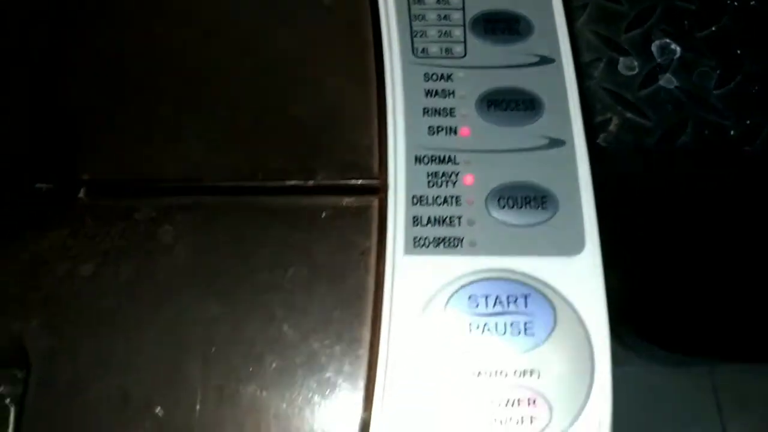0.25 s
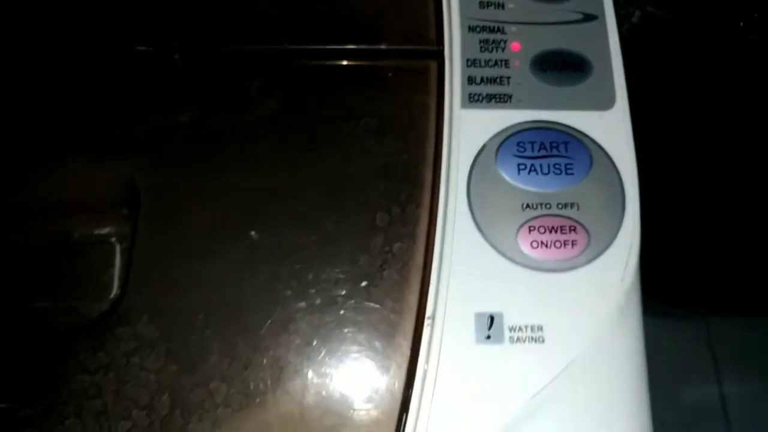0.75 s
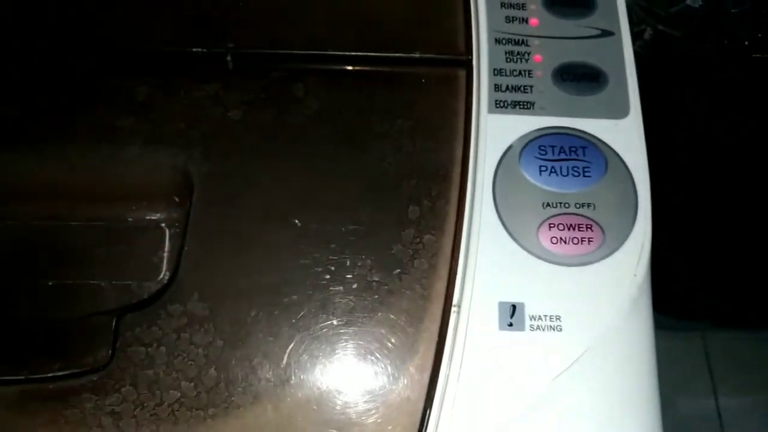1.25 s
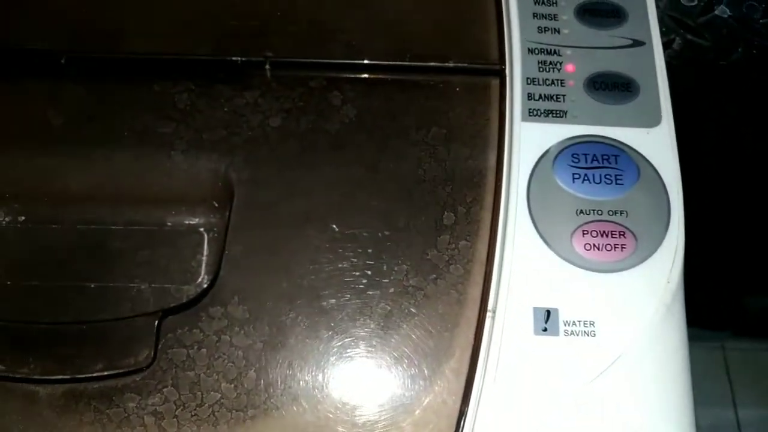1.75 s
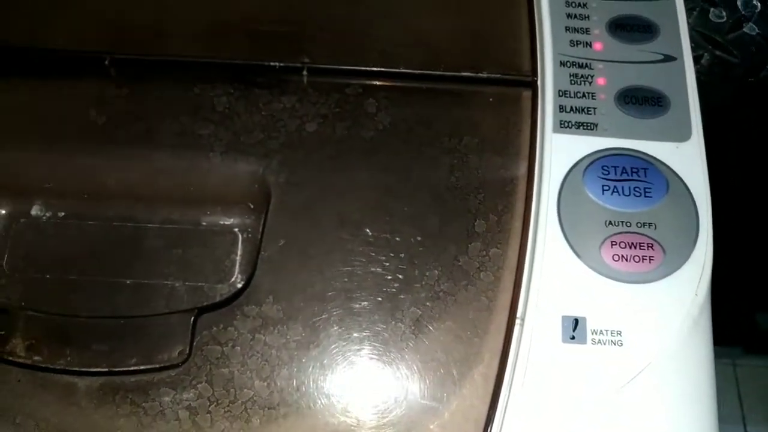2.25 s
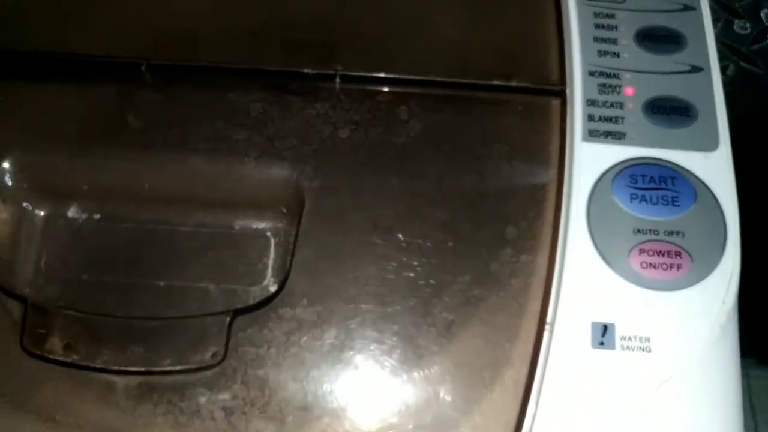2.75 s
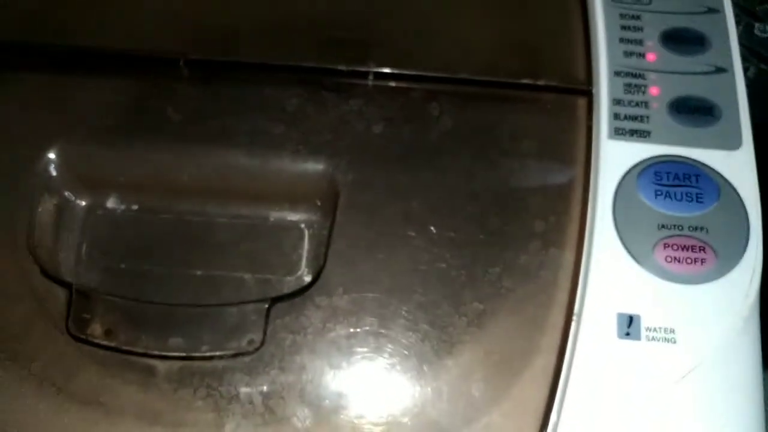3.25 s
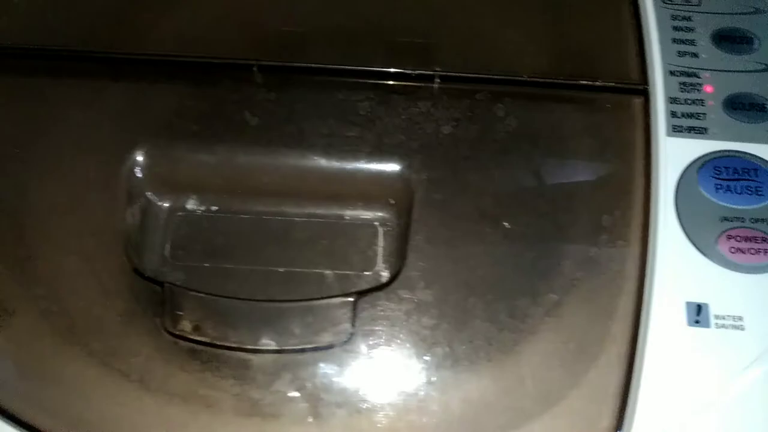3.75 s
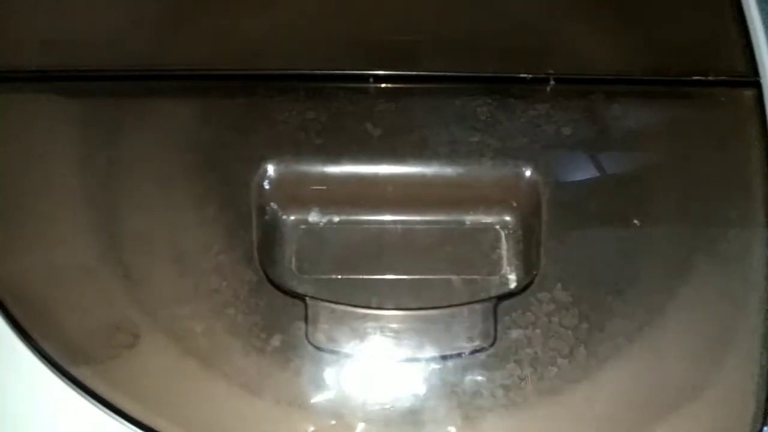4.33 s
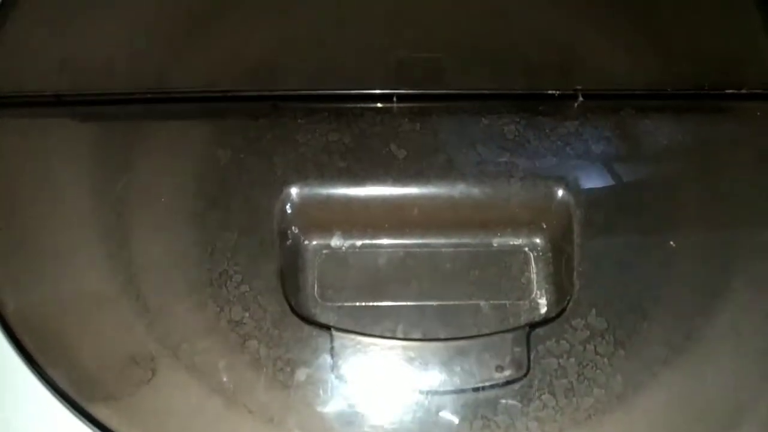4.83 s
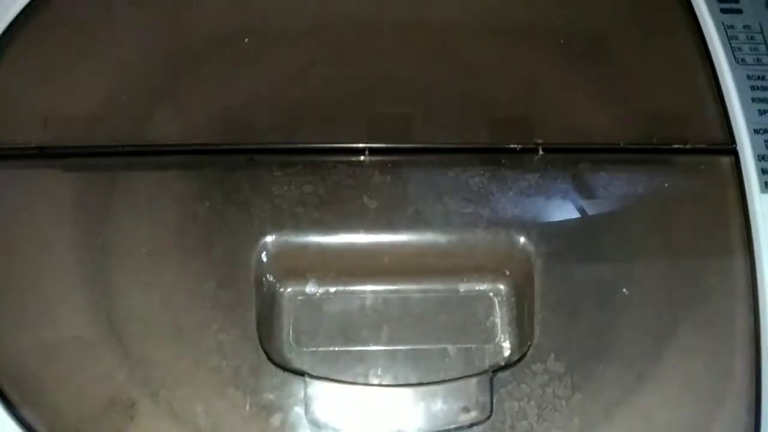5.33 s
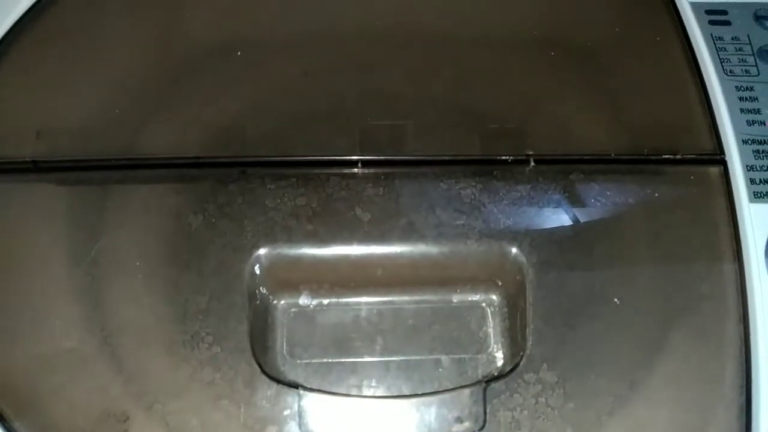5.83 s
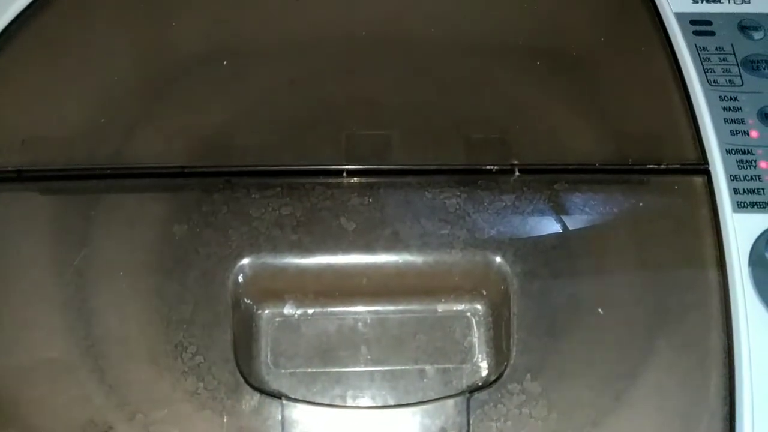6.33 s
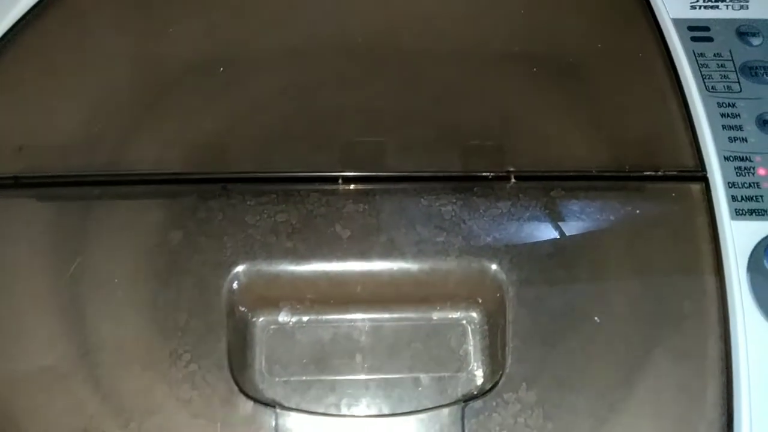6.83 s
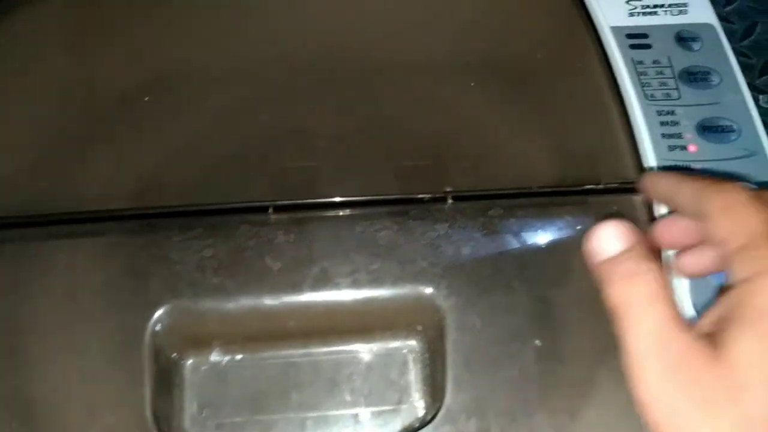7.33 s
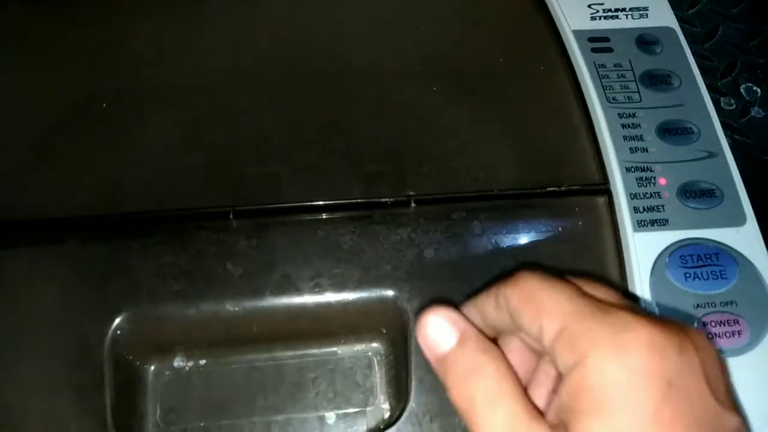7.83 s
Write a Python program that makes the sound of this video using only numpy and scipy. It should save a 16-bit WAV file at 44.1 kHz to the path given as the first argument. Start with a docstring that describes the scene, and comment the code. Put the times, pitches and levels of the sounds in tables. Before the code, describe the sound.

Heard close over a top-loading washing machine indoors: an unloaded drive winds down in wavering, falling tones above a fading tub rumble, with one faint, thin squeak. Then the motor grips abruptly with a short rising growl and three quick dull thuds. A much louder, steady roar follows, full of humming gear tones and sheet-metal resonance, dipping slightly near the end.

```python
"""Washing machine, motor start

A top-loading washing machine, heard close by two microphone ports. The drive coasts down in falling tones
over a loose tub's rumble, with a faint squeak; then the motor cuts in with a growl and a few thuds.
Two shafts' harmonic tones, one set with sidebands of the slowly faster tub, sing over the roar of the
sheet-metal cabinet: noise shaped by panel resonances. The level dips briefly near the end."""
import sys
import numpy as np
from scipy import signal
from scipy.fft import rfft, irfft, next_fast_len
from scipy.io import wavfile
from scipy.ndimage import uniform_filter1d, minimum_filter1d, map_coordinates

SR = 44100
rng = np.random.default_rng(int(sys.argv[2]) if len(sys.argv) > 2 else 0)


def output_pcm(signal):
    """Save a mono or channel-first signal as 16-bit PCM at the path in sys.argv[1].

    Samples are clipped to [-1, 1] before scaling.
    """
    pcm = np.clip(np.atleast_2d(signal).T, -1, 1) * 32767
    wavfile.write(sys.argv[1], SR, np.round(pcm).astype(np.int16))


def decibels_to_gain(level_db):
    """Convert a level in decibels to a linear amplitude gain (20 dB per decade)."""
    exponent = np.asarray(level_db, float) / 20
    return 10 ** exponent


N = 356504

# microphone over the lid: (time [s], place [0-1])
PLACE = [(2.56, 0), (3.4, 0), (3.8, 0.3), (4.4, .65), (6.9, 1), (7.05, .6), (7.6, 0.17), (8.08, 0.27)]


def seconds():
    """Time of each sample."""
    return np.arange(N) / SR


def ramp(start_s, length_s):
    """0 before the start, 1 after the length, straight between."""
    return np.clip((seconds() - start_s) / length_s, 0, 1)


def dip():
    """Depth 0-1 of the brief dip in level."""
    low_s, fall_s, back_s = 7.02, 0.11, 0.4
    return ramp(low_s - fall_s, fall_s) - ramp(low_s, back_s)


def unit(x):
    """Scaled to rms 1."""
    return x / np.sqrt(np.mean(x ** 2) + 1e-20)


def along(points, hz):
    """(Hz, value) points interpolated on a log frequency axis."""
    f, v = np.transpose(points)
    return np.interp(np.log(hz + 1), np.log(f + 1), v)


def curves(rows):
    """One value per sample for each column after the time."""
    s, *cols = np.transpose(rows)
    return [np.interp(seconds(), s, c) for c in cols]


def wobble(knots_per_s):
    """Random curve: normal knots joined by straight lines."""
    knots = rng.standard_normal(int(N * knots_per_s / SR) + 4)
    return map_coordinates(knots, [np.arange(N) * knots_per_s / SR], order=1)


def filtered(x, response):
    """x times a complex response of frequency."""
    m = next_fast_len(N + SR // 2)
    return irfft(rfft(x, m) * response(np.fft.rfftfreq(m, 1 / SR)), m)[..., :N]


def angle(hz):
    """Running angle of a shaft [rad]."""
    return 2 * np.pi * np.cumsum(hz) / SR


def ports(db):
    """Gains of the two ports for a left-right difference."""
    return decibels_to_gain(np.multiply.outer([.5, -.5], db))


def panels(hz, share):
    """Gain of the cabinet's resonances, power peaks over a flat ground; share scales their lift."""
    # panels and air spaces: (centre [Hz], width [Hz], lift [dB])
    resonances = [(72.6, 24, 11.5), (164, 2.9, 12.5), (402, 15.5, 2.5), (499.6, 13, 8), (611, 19, 6.5),
                  (712, 18.5, 9), (830, 20, 2), (898, 16, 2.5), (958, 40, 9.5), (1307.7, 20, 20.5),
                  (1487, 56, 16.5), (2047, 83, 15), (2266, 73, 10), (3025, 160, 7), (4120, 140, 10.5),
                  (4770, 760, 5), (6040, 210, 6)]
    peaks = [(decibels_to_gain(2 * share * db) - 1) / (1 + (2 * (hz - c) / w) ** 2) for c, w, db in resonances]
    return np.sqrt(1 + sum(peaks))


def rush(spectrum, share, patchy_db):
    """Stereo noise of rms 1 through the cabinet, in wide slow and small quick patches of random gain."""
    # unevenness of the small patches, mostly in the treble: (frequency [Hz], signed depth [dB])
    small_patches = [(2000, -0.17), (6500, 2), (7500, 4), (12000, -0.5), (13500, -1)]
    # correlation of the ports: (frequency [Hz], likeness [0-1])
    alike = [(30, .97), (60, .97), (120, .98), (230, .94), (440, .9), (860, .7), (1700, .5), (3300, .3),
             (6300, .1), (12000, .3)]
    # balance of the ports: (frequency [Hz], left over right [dB])
    lean = [(60, .6), (120, .2), (250, 2.5), (520, 1.5), (1060, 2.2), (2160, 6), (3100, 3), (4430, -1.5),
            (6340, -6.5), (7600, 7), (12000, 11)]
    hz, _, z = signal.stft(rng.standard_normal((2, N)), SR, nperseg=512)

    def field(high, long):
        """Random patches: high in frequency bins, long in frames."""
        bins = uniform_filter1d(rng.standard_normal(z.shape[1:]), high, 0)
        return unit(uniform_filter1d(bins, long, 1))

    wide_db = patchy_db * field(high=6, long=14)
    small_db = along(small_patches, hz)[:, None] * field(high=3, long=5)
    pair = signal.istft(z * decibels_to_gain(wide_db + small_db), nperseg=512)[1][:, :N]

    def mid_side(hz):
        turn = np.arccos(np.clip(along(alike, hz), 0, 1)) / 2
        return decibels_to_gain(along(spectrum, hz)) * panels(hz, share) * [np.cos(turn), np.sin(turn)]

    mid, side = filtered(pair, mid_side)
    return unit(filtered(np.array([mid + side, mid - side]), lambda hz: ports(along(lean, hz))))


def coasting():
    """The unloaded mesh falls in pitch, loose and unsteady; higher orders swell as they pass the panels."""
    # coasting drive: (time [s], mesh frequency [Hz])
    coast = [(0, 73), (.8, 61.5), (1.6, 47), (2.05, 42.5), (2.4, 40)]
    # low orders of the mesh: (order, level [dB])
    low_orders = [(2, -23.5), (3, -24), (4, -28)]
    # how the cabinet carries the low orders: (frequency [Hz], gain [dB])
    body = [(85, -21), (116, -10.5), (128, 1), (150, -4), (168, 6), (182, -5), (198, 5), (216, -3.5),
            (300, -9)]
    low_fade_db_per_s, high_db, high_fade_db_per_s = 2, -31.5, 1.2
    hz, = curves(coast)
    turn = angle(hz)
    tones = np.zeros(N)
    for k, db in low_orders:
        level_db = db + along(body, k * hz) - low_fade_db_per_s * seconds()
        tones += decibels_to_gain(level_db + 1.8 * wobble(9)) * np.cos(k * turn + .3 * wobble(15))
    for k in (4.6, 5, 6, 7, 8):
        swell = panels(k * hz[::64], share=0.98).repeat(64)[:N]
        level_db = high_db - high_fade_db_per_s * seconds() - (k - 3.5) + 4 * wobble(5.04)
        tones += decibels_to_gain(level_db) * swell * np.cos(k * turn + 0.16 * k * wobble(12))
    return np.sqrt(2) * tones * (np.arange(N) < coast[-1][0] * SR)


def rumble():
    """The loose tub quietens as it slows, lurches when the motor grips, then runs true."""
    # noise spectrum: (frequency [Hz], density [dB per Hz])
    spectrum = [(95, -20), (130, -7), (300, -5.5), (450, -8.5), (620, -15), (900, -22.5), (1150, -30.5),
                (2500, -38), (3600, -43.5), (6500, -49), (7200, -57.5), (9500, -67.5), (11500, -75),
                (13000, -84), (14500, -100)]
    start_db, fade_db_per_s = -17.5, 1.3
    lurch_s, lurch_rise_s, lurch_db, lurch_end_db_per_s = 2.53, 0.13, 8.5, 329
    t = seconds()
    level_db = start_db - fade_db_per_s * t + lurch_db * ramp(lurch_s - lurch_rise_s, lurch_rise_s)
    level_db -= lurch_end_db_per_s * np.maximum(t - lurch_s, 0)
    return decibels_to_gain(level_db + 0.4 * wobble(5.9)) * rush(spectrum, share=0.54, patchy_db=1.0)


def rattle():
    """Upper rumble while the tub is still fast: band noise that fades steadily."""
    # noise spectrum: (frequency [Hz], density [dB per Hz])
    spectrum = [(480, -30), (600, -2), (720, 2.5), (920, -2), (1100, -35)]
    start_db, fade_db_per_s = -29.5, 7.5
    return decibels_to_gain(start_db - fade_db_per_s * seconds()) * rush(spectrum, share=2.3, patchy_db=1.0)


def drone(running):
    """Deep drone of the floor: low noise, a little softer once the motor runs."""
    # noise spectrum: (frequency [Hz], density [dB per Hz])
    spectrum = [(20, -32), (38, -24), (50, -4), (62, -6), (72, -1), (85, -3), (100, -9), (125, -30)]
    coast_db, run_db = -47.5, -50.5
    level_db = coast_db + (run_db - coast_db) * running + 1.5 * wobble(2.5)
    return decibels_to_gain(level_db) * rush(spectrum, share=0.93, patchy_db=1.9)


def squeak():
    """A thin, breathy tone that slides up and fades; random phase and level roughen it."""
    start_s, glide_s, hold_s = 1.03, .12, .18
    low_hz, top_hz = 2350, 2735
    top_db, rise_db, fade_db_per_s = -50, 8, 70
    top_s, slide = start_s + glide_s, ramp(start_s, glide_s)
    hz = low_hz + (top_hz - low_hz) * slide
    db = top_db - rise_db * (1 - slide) - fade_db_per_s * np.maximum(seconds() - top_s, 0)
    gate = ramp(start_s, .02) - ramp(top_s + hold_s, .03)
    return np.sqrt(2) * gate * decibels_to_gain(db + 4 * wobble(40)) * np.cos(angle(hz) + .8 * wobble(80))


def growl():
    """The stalled motor swells into a low, climbing tone with its octave and lets go."""
    start_s, rise_s, t60_s, level_db = 2.41, 0.07, 0.23, -15
    start_hz, climb_hz_per_s = 164.4, 250
    since = seconds() - start_s
    turn = angle(start_hz + climb_hz_per_s * np.clip(since, 0, 1))
    decay = decibels_to_gain(level_db - 60 * np.maximum(since - rise_s, 0) / t60_s)
    shape = np.sqrt(ramp(start_s, rise_s)) * decay
    return np.sqrt(2) * shape * (np.cos(turn) + decibels_to_gain(-6) * np.cos(2 * turn + wobble(40)))


def shafts():
    """Angles of mesh, tub and second shaft; the tub catches up, then gains speed evenly."""
    # motor on: (time [s], gear mesh [Hz], second shaft [Hz])
    speed = [(2.55, 64.4, 98.77), (3.35, 64.424, 98.844), (6.3, 63.648, 97.613), (6.95, 63.869, 97.965),
             (8.09, 65.188, 99.676)]
    # angles at the first speed row: (mesh [rad], tub [rad], second shaft [rad])
    start_rad = (.59, 2.18, 1.9)
    base_hz, gain_hz_per_s, lag_hz, catch_s = 9.57, .606, 1.64, .2
    first = round(speed[0][0] * SR)
    mesh_hz, second_hz = curves(speed)
    since = np.maximum(seconds() - speed[0][0], 0)
    tub_hz = base_hz + gain_hz_per_s * since - lag_hz * np.exp(-since / catch_s)
    turns = [angle(hz) for hz in (mesh_hz, tub_hz, second_hz)]
    return [turn - turn[first] + start for turn, start in zip(turns, start_rad)]


def roar(mesh, tub, running):
    """Cabinet noise of the motor, pulsing with mesh and tub, louder while the motor strains."""
    # noise spectrum: (frequency [Hz], density [dB per Hz])
    spectrum = [(95, -21.5), (130, -14), (240, -7), (350, -4), (420, -1.5), (540, -8.5), (700, -4.5),
                (960, -13.5), (1150, -23), (1700, -26), (2440, -24.5), (3040, -22), (3730, -30.5),
                (6000, -31.5), (6800, -34), (7300, -46.5), (8800, -42.5), (10200, -49), (11500, -47),
                (13000, -60), (14400, -73)]
    # colour with the microphone at place 0: (frequency [Hz], gain [dB])
    edge = [(500, 0), (700, -2), (900, 0.5), (1400, 1), (1900, 0), (2150, 3.5), (2600, 1), (4000, 0),
            (9000, -1)]
    level_db, strain_from_s, strain_db, strain_settle_s, dip_db = -18.5, 2.413 + .11, 2.5, 0.39, -2.5
    strain = np.exp(-np.maximum(seconds() - strain_from_s, 0) / strain_settle_s)
    roar_db = level_db + strain_db * strain + dip_db * dip() + 0.5 * wobble(9)
    pulse = 1 + 0.02 * np.cos(mesh) + 0.021 * np.cos(2 * mesh) + 0.02 * np.cos(tub)
    middle, (place,) = rush(spectrum, share=1.0, patchy_db=0.64), curves(PLACE)
    heard = place * middle + (1 - place) * filtered(middle, lambda hz: decibels_to_gain(along(edge, hz)))
    return running * decibels_to_gain(roar_db) * pulse * heard


def thuds():
    """The motor takes up the slack: soft blows ring the frame's decaying modes."""
    # blows: (time [s], level [dB])
    blows = [(2.418, -9.5), (2.464, -5.5), (2.508, -8.5)]
    # frame modes: (frequency [Hz], level [dB], t60 [s])
    modes = [(170, -8, .2), (200, -4, 0.13), (321, -4, 0.13), (408, -4, .1), (504, -1, 0.21),
             (615, -11, 0.12), (816, -9, 0.11), (945, -14, .1)]
    out, t = np.zeros(N + SR), np.arange(SR // 2) / SR
    for s, db in blows:
        ring = np.zeros(len(t))
        for hz, level_db, t60_s in modes:
            decay = decibels_to_gain(level_db + rng.normal(0, 2) - 60 * t / t60_s)
            ring += decay * np.sin(2 * np.pi * hz * t)
        out[round(s * SR):][:len(t)] += decibels_to_gain(db) * ring * (1 - np.exp(-t / 0.011))
    return out[:N]


def drive(mesh, tub, second):
    """Mesh and shaft orders; the off-centre tub adds a line one turn rate above and below each mesh order."""
    # gear mesh: (order, level [dB], lower tub sideband [dB], upper tub sideband [dB],
    #             left over right [dB], gain from place 0 to 1 [dB])
    mesh_orders = [(2, -31, -49, -50, -.2, -3), (3, -28.5, -51, -49, 2.2, -4), (4, -21, -41, -24, 5.8, 3),
                   (5, -35, -43, -30, 1.9, 0.1), (6, -26, -42, -45, 2.1, 5), (7, -39, -34, -44, 2.2, 7),
                   (8, -21, -28, -32, .9, 1.5), (9, -30, -40, -37, -2.5, -6), (10, -28, -35, -40, 6.1, 4),
                   (11, -31, -34, -33, -1.7, 6), (12, -37, -41, -42, 1.6, -3),
                   (13, -34, -38, -48, -3.1, -4), (14, -38, -42, -45, -5.4, -4),
                   (15, -36, -38, -43, .6, -1.5), (20, -46, -56, -50, 4.2, -8), (32, -32, -46, -45, 9, -24),
                   (35, -41, -48, -48, 6, -20)]
    # second shaft: (order, level [dB], left over right [dB], gain from place 0 to 1 [dB])
    shaft_orders = [(2, -28.5, 1.6, -3), (3, -18.5, 2.7, -5), (4, -42, -.4, 9), (5, -34, -.3, -4)]
    on_s, rise_s, from_db, run_db, dip_db = 2.47, .09, -32, -.5, -2.5
    place, = curves(PLACE)
    level_db = from_db + (run_db - from_db) * ramp(on_s, rise_s) + dip_db * dip()
    out = np.zeros((2, N))
    for order, db, low_db, high_db, pan_db, gain_db in mesh_orders:
        # phase grows with order squared, smearing the pulses; backlash shakes it
        turn = order * mesh + .22 * order ** 2 + .012 * order * wobble(12)
        tone_db = db + gain_db * place + (.6 + .06 * order) * wobble(5)
        tone = decibels_to_gain(tone_db) * np.cos(turn)
        shift_rad = .2 * (order - 4)
        sides = decibels_to_gain(low_db) * np.cos(turn - tub + shift_rad)
        sides += decibels_to_gain(high_db) * np.cos(turn + tub + 3 * shift_rad)
        out += ports(pan_db)[:, None] * (tone + decibels_to_gain(1.8 * wobble(3)) * sides)
    for order, db, pan_db, gain_db in shaft_orders:
        tone = decibels_to_gain(db + gain_db * place + .7 * wobble(4)) * np.cos(order * second)
        out += ports(pan_db)[:, None] * tone
    return np.sqrt(2) * decibels_to_gain(level_db) * out * (seconds() > on_s)


def scene():
    """All parts of the machine, with a phase difference between the ports."""
    # phase between the ports: (frequency [Hz], lead of left [rad])
    lead = [(30, 0), (130, -.1), (260, .05), (600, .7), (1030, 1.1), (1460, 2.1), (1810, 1.5), (2240, 6.2),
            (3700, 6.3), (4650, -.4), (6550, -3.8)]
    mesh, tub, second = shafts()
    running = ramp(2.413, .11)
    both = rumble() + rattle() + drone(running) + roar(mesh, tub, running) + drive(mesh, tub, second)
    both += ports(1.5)[:, None] * (coasting() + growl() + thuds())
    both += ports(11.0)[:, None] * squeak()
    return filtered(both, lambda hz: np.exp(1j * np.multiply.outer([.5, -.5], along(lead, hz))))


def roll_off(x):
    """The treble ends steeply here."""
    return signal.sosfilt(signal.butter(12, 14300, fs=SR, output="sos"), x)


def record(dry):
    """The microphones lose the deepest bass; a look-ahead limiter holds peaks under full scale."""
    heard = filtered(dry, lambda hz: hz ** 4 / (hz ** 4 + 40 ** 4))
    need = np.minimum(1, .97 / np.abs(heard).max(axis=0))
    gain = uniform_filter1d(minimum_filter1d(need, size=881), size=441)
    return roll_off(heard * gain)


dry = scene()
out = record(dry)
output_pcm(out)
```